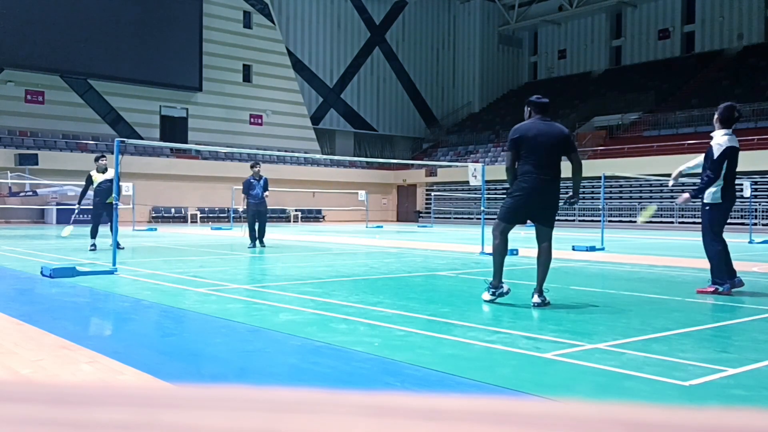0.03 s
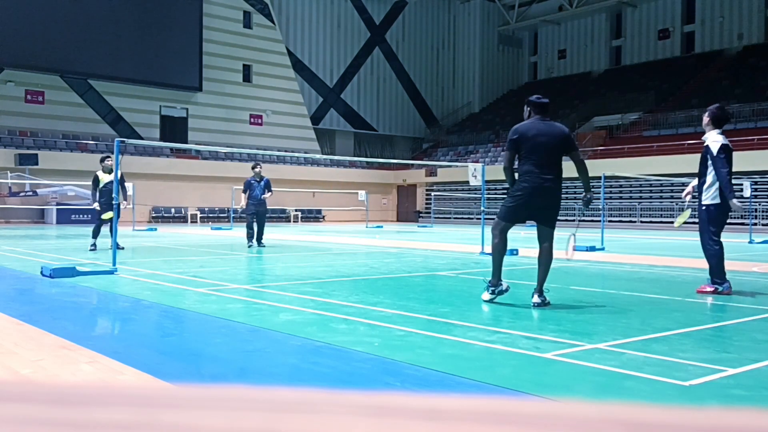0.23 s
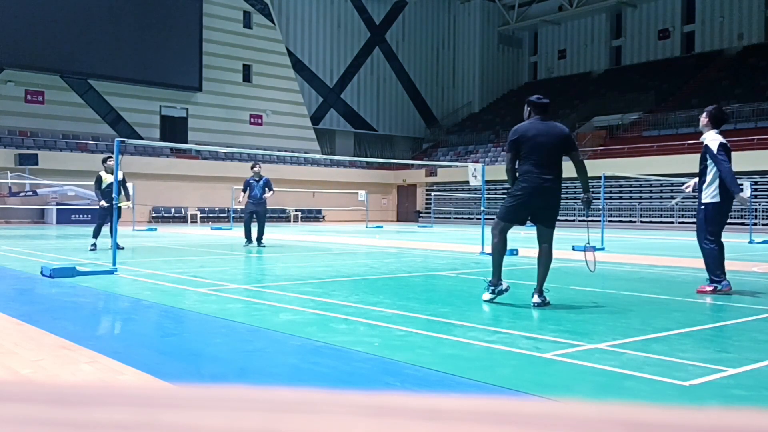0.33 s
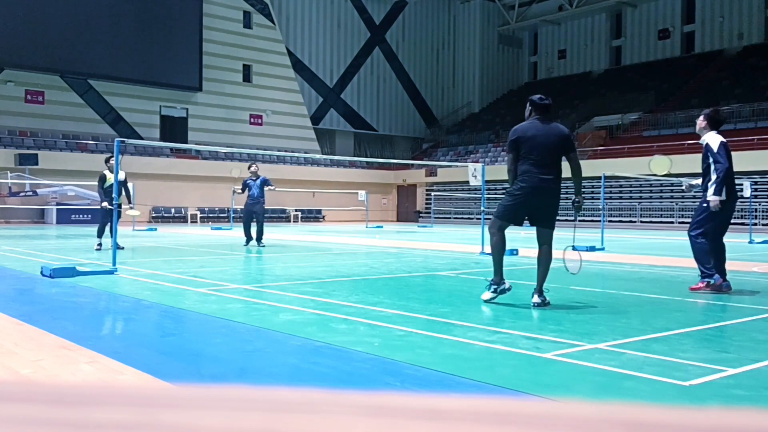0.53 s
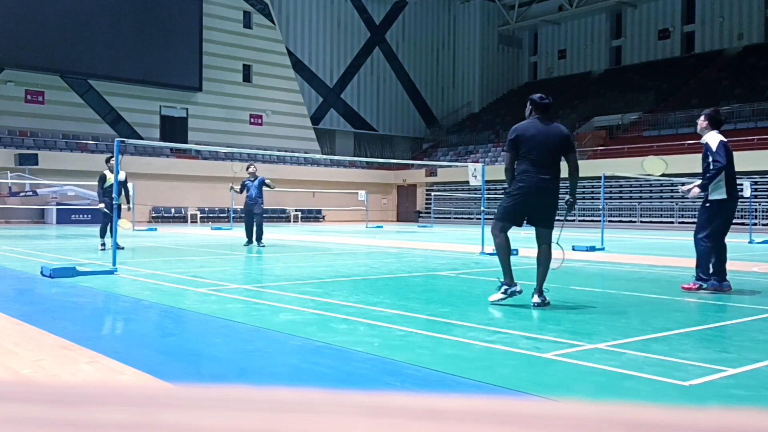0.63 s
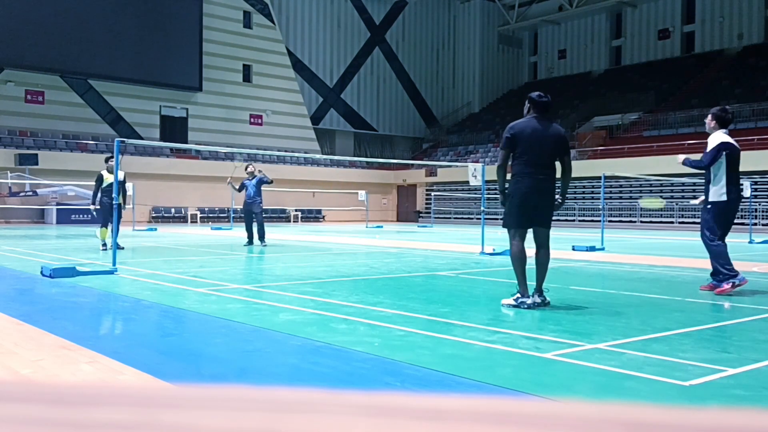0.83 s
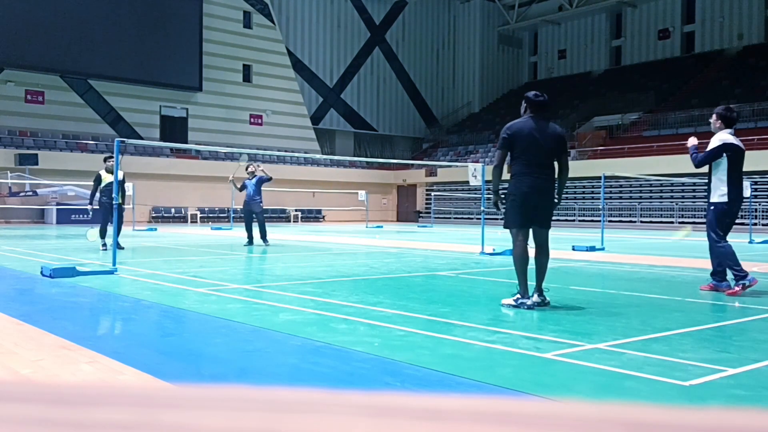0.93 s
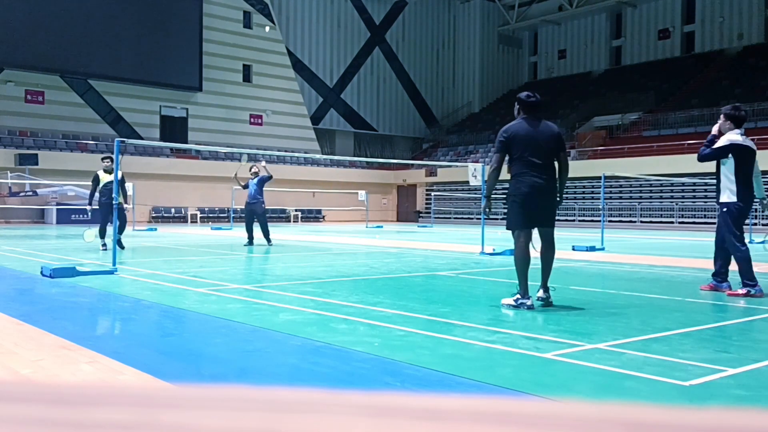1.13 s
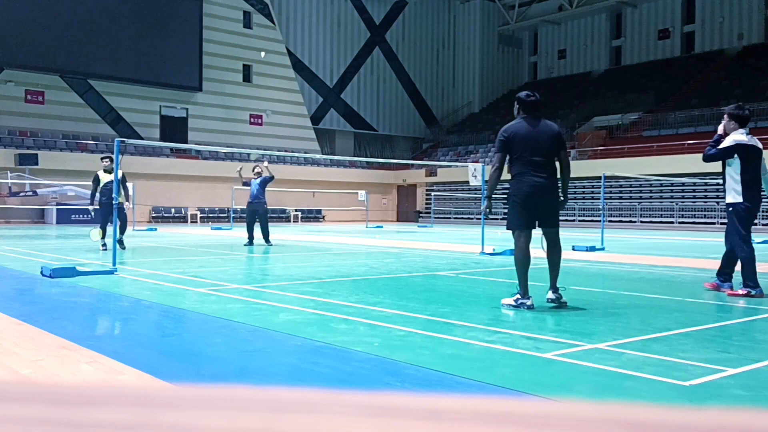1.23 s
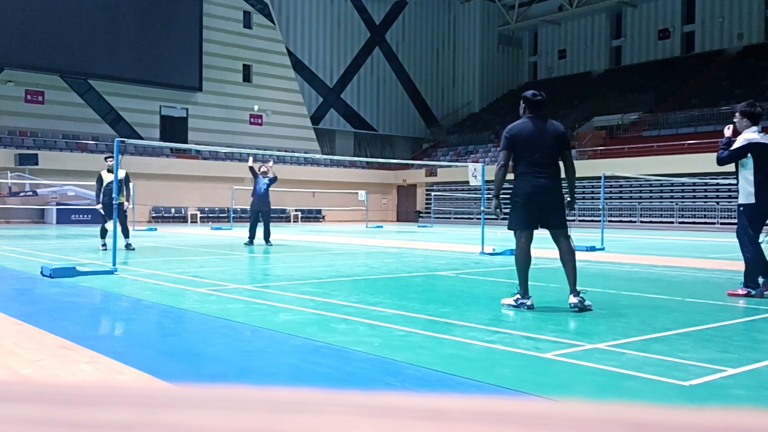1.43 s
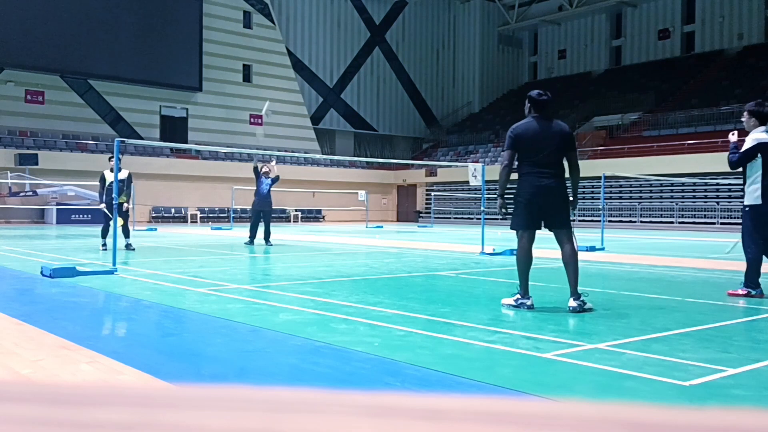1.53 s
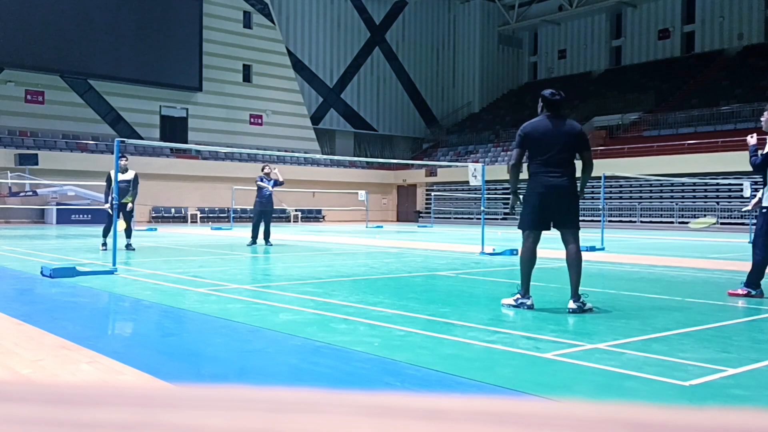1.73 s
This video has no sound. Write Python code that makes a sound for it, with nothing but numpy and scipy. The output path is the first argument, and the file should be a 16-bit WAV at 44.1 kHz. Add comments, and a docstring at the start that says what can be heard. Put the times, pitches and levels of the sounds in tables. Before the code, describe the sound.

One crisp badminton hit with a bright snap and long hall echo, then soft footsteps

```python
"""One overhead badminton stroke in a large sports hall, over a low hum and the wash of the ventilation.
Two soft footfalls, decaying sines with noise, come first; then the racket swishes, a brief burst of shaped noise.
The strings crack on the shuttlecock: short clicks, damped string modes and a buzz of scattered echoes.
Floor, walls and stands throw the crack back along delayed paths, and decaying noise rings for over a second.
More footfalls and one heel click on the sprung court follow while the hall dies away."""
import sys
import numpy as np
from scipy import signal
from scipy.fft import rfft, irfft
from scipy.io import wavfile
from scipy.ndimage import uniform_filter1d

SR = 44100
rng = np.random.default_rng(int(sys.argv[2]) if len(sys.argv) > 2 else 0)


def inscribe(sig):
    """Save sig as 16-bit PCM at rate SR to the path in sys.argv[1].

    A 1-D sig is mono; a 2-D sig holds one channel per row.
    Samples are clipped to [-1, 1] before scaling.
    """
    pcm = np.round(np.clip(np.atleast_2d(sig).T, -1, 1) * 32767)
    wavfile.write(sys.argv[1], SR, pcm.astype(np.int16))


N = 79380  # length [samples]
HIT_S = 0.2044  # the cork meets the strings


def amp(db):
    """Logarithmic level: decibels to amplitude gain."""
    return 10 ** (np.asarray(db) / 20)


def unit(x):
    """Normalisation: scales to an rms of one."""
    return x / np.sqrt(np.mean(x ** 2) + 1e-20)


def read(points, hz):
    """Logarithmic pitch: interpolates a table on a log-frequency axis."""
    f, value = np.transpose(points)
    return np.interp(np.log(hz + 1), np.log(f + 1), value)


def fade(t, t60):
    """Exponential decay: falls 60 dB in t60 seconds from time zero, silent before it."""
    decay_rate = np.log(1000) / np.maximum(t60, 1e-4)
    return (t >= 0) * np.exp(-decay_rate * np.maximum(t, 0))


def swell(t, width_s):
    """Gaussian envelope: rises and falls symmetrically about time zero."""
    return np.exp(-.5 * (t / width_s) ** 2)


def pan(db):
    """Interaural level difference: left and right gains, positive towards the left."""
    return amp(np.array([[db], [-db]]) / 2)


def clock(start_s=0):
    """Time axis: seconds since a given moment."""
    return np.arange(N) / SR - start_s


def delay(x, s):
    """Linear phase shift: delays by any fraction of a sample."""
    hz = np.fft.rfftfreq(2 * N, 1 / SR)
    return irfft(rfft(x, 2 * N) * np.exp(-2j * np.pi * hz * s))[..., :N]


def convolve(a, b):
    """Superposition of echoes: convolves along time, channel by channel."""
    return signal.fftconvolve(np.atleast_2d(a), np.atleast_2d(b), axes=1)[:, :N]


def click(spectrum, size=2048):
    """Minimum-phase impulse: a causal click of unit energy with the given colour."""
    log_gain = np.log(amp(read(spectrum, abs(np.fft.fftfreq(size, 1 / SR)))))
    # the Hilbert transform of the log gain supplies the minimum phase
    x = np.fft.ifft(np.exp(np.conj(signal.hilbert(log_gain)))).real
    return np.pad(x / np.linalg.norm(x), (0, N - size))


def noise(spectrum, likeness):
    """Partial coherence: coloured stereo noise with an rms of one, mixed from mid and side."""
    hz = np.fft.rfftfreq(N, 1 / SR)
    a, b = rfft(rng.standard_normal((2, N)))
    same = np.clip(read(likeness, hz), -1, 1)
    mid = a * np.sqrt(1 + same)
    side = b * np.sqrt(1 - same)
    stereo = np.array([mid + side, mid - side])
    return unit(irfft(stereo * amp(read(spectrum, hz)), N))


# left-right likeness of scattered sound: (frequency [Hz], correlation [-1 to 1])
HALL_LIKENESS = [(100, 1), (300, .7), (600, 0.5), (1200, 0.05), (3000, 0.033), (13000, 0.017)]


def scatter(t60, channels=2):
    """Diffuse reflection: a dying spray of small echoes with unit energy, alike in both ears in the bass."""
    white = [(1, 0), (SR, 0)]
    x = noise(white, HALL_LIKENESS)[:channels] * fade(clock(), t60)
    return x / np.linalg.norm(x, axis=1, keepdims=True)


# colour of the crack: (frequency [Hz], relative level per Hz [dB])
CRACK_COLOUR = [(50, -40), (150, -11), (420, -17), (850, 0), (1180, -24.5), (1650, 1.5), (2000, 6.5),
                (2350, 2.5), (2600, 0.5), (3050, -8.5), (3800, -3), (5000, -9.5), (6600, -0.5),
                (8000, -6.5), (13000, -8.5)]
# paths to the listener: (delay [s], mirror reflection [dB], scattered part [dB], scatter T60 [s],
# left over right [dB], right-ear lag [s]); direct sound first, then floor, walls and stands
PATHS_TO_EARS = [(0, 0, -24, .012, 0, .00012), (.0103, -.5, -14, .01, 2, .00038),
                 (.0109, -6, -24, .01, 2, .00025), (.0134, -7, -18, .02, -2, -.00025),
                 (.0147, -14, -22, .02, 5, .0002), (.047, -13, -20, .025, 4, .0003),
                 (.0501, -13, -20, .03, 2, -.0001), (.054, -20, -22, .04, 2, .0002),
                 (.0585, -21, -19, .03, 0, .0002), (.173, -23, -16, .07, 1, .0003)]
RATTLE_DB, RATTLE_T60_S = -2, 0.034  # feathers and strings buzz, relative to the snap
BRUSH_S, BRUSH_DB = .0019, -17  # lead of the feathers touching before the cork
RELEASE_S, RELEASE_DB = .00117, -4.5  # second snap as the cork leaves the strings
HIT_DB = 1.5  # gain of the whole blow


def racket():
    """Impact and image sources: the cork snaps on and off the strings and arrives along several paths."""
    snap = click(CRACK_COLOUR)
    buzz = amp(RATTLE_DB) * convolve(snap, scatter(RATTLE_T60_S))
    brush = amp(BRUSH_DB) * convolve(snap, scatter(RATTLE_T60_S / 2))
    blow = delay(buzz - snap - strings(), HIT_S)
    blow = blow - amp(RELEASE_DB) * delay(snap, HIT_S + RELEASE_S)
    blow = blow + delay(brush, HIT_S - BRUSH_S)
    out = np.zeros((2, N))
    for late_s, mirror_db, spray_db, t60, pan_db, lag_s in PATHS_TO_EARS:
        mirror = amp(mirror_db) * blow
        spray = amp(spray_db) * convolve(blow, scatter(t60))
        left, right = pan(pan_db) * (mirror + spray)
        out += [delay(left, late_s), delay(right, late_s + lag_s)]
    return amp(HIT_DB) * out


# ringing modes of strings and frame: (frequency [Hz], level within the blow [dB], T60 [s])
STRING_MODES = [(918, -29, 0.0063), (1514, -29.5, 0.05), (2044, -33.5, 0.043), (2110, -32, 0.033),
                (2595, -33, 0.014), (4043, -26, .03), (6330, -29, 0.065), (6750, -28.5, 0.055)]


def strings():
    """Modal synthesis: strings and frame ring after the blow as damped sines."""
    t = clock()
    return sum(amp(db) * fade(t, t60) * np.sin(2 * np.pi * hz * t) for hz, db, t60 in STRING_MODES)


# colour of the swish: (frequency [Hz], relative level per Hz [dB])
SWISH_COLOUR = [(100, -46), (450, -6), (850, -7), (1300, -14), (2500, -31.5), (7000, -22.5), (14000, -47)]
SWISH_S, SWISH_WIDTH_S, SWISH_DB = .1965, .0028, -42  # peak moment, Gaussian width, level


def swish():
    """Aerodynamic noise: air whistles round the racket just before contact, a Gaussian noise burst."""
    return amp(SWISH_DB) * noise(SWISH_COLOUR, HALL_LIKENESS) * swell(clock(SWISH_S), SWISH_WIDTH_S)


# colour of the reverberation: (frequency [Hz], relative level per Hz [dB])
HALL_COLOUR = [(60, -35), (110, -11.5), (240, -13.5), (450, -7.5), (720, -4.5), (1000, -13), (1220, -17),
               (1550, -9), (1900, -8), (2550, -8), (3300, -12), (4000, -9), (4600, -7.5), (5000, -15),
               (6100, -9.5), (6700, -6.5), (7400, -12.5), (8000, -32), (13000, -17)]
# reverberation time, before each tail takes its share: (frequency [Hz], T60 [s])
HALL_DECAY = [(100, 0.53), (300, 2.16), (650, 2.83), (1300, 2.1), (2500, 1.5), (4500, 1.445), (7000, 1.32),
              (13000, 1.1)]
# tails from the near stands, then from the roof and far end:
# (delay [s], rise [s], level [dB], share of the hall's T60 [ratio])
HALL_TAILS = [(0.013, .009, -36.5, 0.78), (0.148, 0.033, -38.5, 0.94)]
# colour of the low middle swelling back from the stands: (frequency [Hz], relative level per Hz [dB])
BLOOM_COLOUR = [(100, -16), (250, -19), (380, -7.5), (620, -11.5), (800, -10.5), (1100, -32.5),
                (3000, -20.5), (13000, -31.5)]
BLOOM_S, BLOOM_WIDTH_S, BLOOM_DB = 0.12, 0.073, -42  # peak after the hit, Gaussian width, level
NEAR_DB, NEAR_T60_S = -34, .17  # bright scatter off the court
HALL_PAN_DB, FLUTTER_DB = 2, 1.44  # left over right; rms flutter as echoes arrive in clusters


def hall():
    """Frequency-dependent reverberation: court scatter, a low bloom, then two tails of decaying noise."""
    since_hit = clock(HIT_S)
    out = amp(NEAR_DB) * noise(CRACK_COLOUR, HALL_LIKENESS) * fade(since_hit, NEAR_T60_S)
    bloom = amp(BLOOM_DB) * noise(BLOOM_COLOUR, HALL_LIKENESS)
    out += bloom * swell(clock(HIT_S + BLOOM_S), BLOOM_WIDTH_S) * (since_hit > 0)
    for late_s, rise_s, db, share in HALL_TAILS:
        # each frequency band decays at its own rate
        hz, t, z = signal.stft(noise(HALL_COLOUR, HALL_LIKENESS), SR, nperseg=512)
        t60 = share * read(HALL_DECAY, hz)[:, None]
        z = z * fade(np.maximum(t - HIT_S - late_s, 0), t60)
        tail = signal.istft(z, SR)[1][:, :N]
        out += amp(db) * tail * np.clip(clock(HIT_S + late_s) / rise_s, 0, 1)
    clusters = unit(uniform_filter1d(rng.standard_normal((2, N)), size=180, axis=1))
    return out * pan(HALL_PAN_DB) * amp(FLUTTER_DB * clusters)


# footfalls: (time [s], thud [dB], board pitch [Hz], sole click [dB], left over right [dB])
FOOTFALLS = [(.019, -46, 100, -72, 1), (.079, -51, 110, -72, .5), (.829, -51, 175, -66, .5),
             (.9815, -42, 135, -55, .5), (.9965, -44, 205, -58, 0), (1.049, -49, 120, -72, -1),
             (1.174, -45, 160, -70, -.5), (1.434, -55, 200, -49, 1), (1.449, -60, 130, -51, .5),
             (1.509, -56, 200, -53, 0), (1.535, -48, 130, -68, -.5), (1.701, -62, 110, -51, -1.5),
             (1.7155, -42, 112, -54, -1)]
# colour of the rumble under the boards: (frequency [Hz], relative level per Hz [dB])
THUD_COLOUR = [(30, -50), (70, -19), (115, 7.5), (200, -6), (300, -8.5), (800, -32.5), (2000, -22),
               (8000, -46)]
# colour of the sole's tick: (frequency [Hz], relative level per Hz [dB])
SOLE_COLOUR = [(200, -12), (700, -11), (1700, 3), (2800, -21), (4200, 10), (5500, -9.5), (7000, -4),
               (13000, -3)]
# colour of the heel click: (frequency [Hz], relative level per Hz [dB])
HEEL_COLOUR = [(60, -27), (200, -1), (600, 13), (1600, -4), (2600, -13), (4500, -14), (9000, -26)]
HEEL_S, HEEL_DB = .9817, -26.5
BOARD_T60_S, THUD_T60_S, SOLE_T60_S = 0.062, .17, .016
RUMBLE_DB = -8.5  # relative to the board's ring
STEP_WET_DB, STEP_T60_S = -8, .6  # scattered echoes of the steps, relative to the steps


def steps():
    """Damped resonance: soles tick on the court; the boards give, ring briefly and rumble beneath them."""
    out = np.zeros((2, N)) - amp(HEEL_DB) * delay(click(HEEL_COLOUR), HEEL_S)
    for s, thud_db, hz, click_db, pan_db in FOOTFALLS:
        t = clock(s)
        board = -np.sin(2 * np.pi * hz * t) * fade(t, BOARD_T60_S)
        rumble = amp(RUMBLE_DB) * noise(THUD_COLOUR, AIR_LIKENESS) * fade(t, THUD_T60_S)
        tick = amp(click_db) * noise(SOLE_COLOUR, AIR_LIKENESS) * fade(t, SOLE_T60_S)
        out += pan(pan_db) * (amp(thud_db) * (board + rumble) + tick)
    return out + amp(STEP_WET_DB) * convolve(out, scatter(STEP_T60_S, channels=1))


# colour of the moving air: (frequency [Hz], relative level per Hz [dB])
AIR_COLOUR = [(20, -36), (45, -4.5), (65, -6), (100, 5.5), (150, -3), (300, -3.5), (600, -6.5), (1100, -14),
              (2000, -19.5), (4000, -21.5), (7000, -25.5), (13000, -24)]
# left-right likeness of the air, also used for the footfalls: (frequency [Hz], correlation [-1 to 1])
AIR_LIKENESS = [(50, 0.93), (150, 0.65), (500, 0.56), (1200, 0.083), (4000, 0.067), (13000, 0.052)]
AIR_DB = -58
HUM_HZ, HUM_DB, HUM_WAVER = 100, -69.5, 0.15  # waver: rms share of the amplitude


def ventilation():
    """Stationary noise and amplitude modulation: a steady wash of air and a wavering electrical hum."""
    waver = unit(uniform_filter1d(rng.standard_normal(N), size=5000))
    hum = unit((1 + HUM_WAVER * waver) * np.sin(2 * np.pi * HUM_HZ * clock()))
    return amp(AIR_DB) * noise(AIR_COLOUR, AIR_LIKENESS) + amp(HUM_DB) * hum


def scene():
    """Linear superposition: the stroke, its hall, the feet and the background add."""
    return racket() + swish() + hall() + steps() + ventilation()


CEILING = .7  # amplitude that rounded peaks approach
LOW_CUT_HZ, GAP_HZ, EDGE_HZ = 69, (8150, 11650), 14550
HISS_DB = -80.5  # before the upper edge filter


def record(dry):
    """Saturation and filtering: rounded peaks, thin deep bass, a treble gap, faint hiss, a steep upper edge."""
    rounded = CEILING * np.tanh(dry / CEILING)
    low_cut = signal.butter(4, LOW_CUT_HZ, "highpass", fs=SR, output="sos")
    thin = signal.sosfilt(low_cut, rounded)
    hollow = signal.firwin(161, GAP_HZ, window=("kaiser", 6), fs=SR)  # band-stop
    edge = signal.firwin(191, EDGE_HZ, window=("kaiser", 8), fs=SR)  # low-pass
    coloured = signal.oaconvolve(thin, hollow[None], "same", axes=1)
    hiss = amp(HISS_DB) * rng.standard_normal((2, N))
    return signal.oaconvolve(coloured + hiss, edge[None], "same", axes=1)


dry = scene()
out = record(dry)
inscribe(out)
```